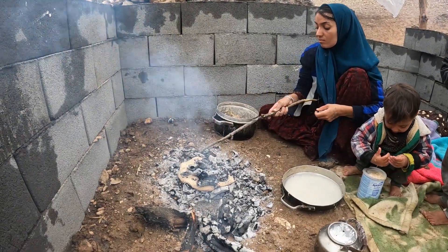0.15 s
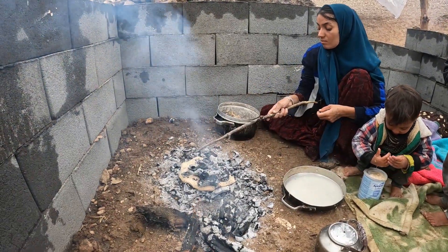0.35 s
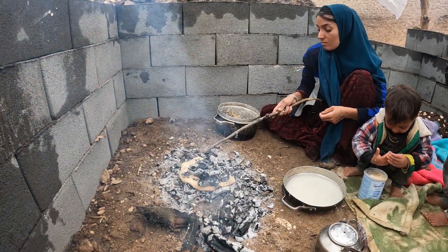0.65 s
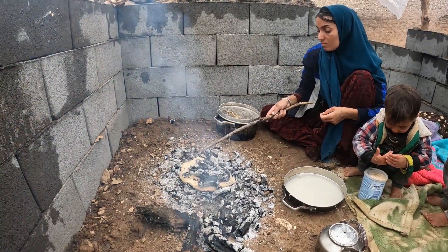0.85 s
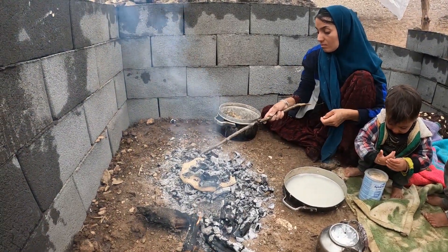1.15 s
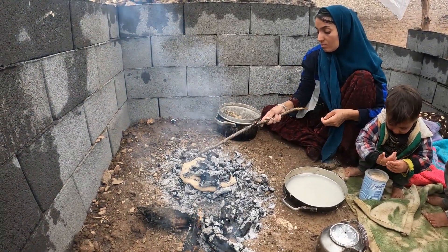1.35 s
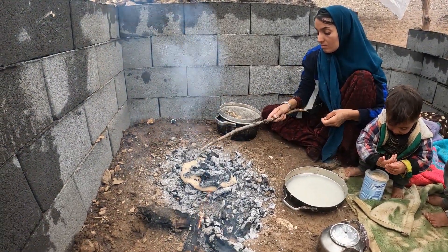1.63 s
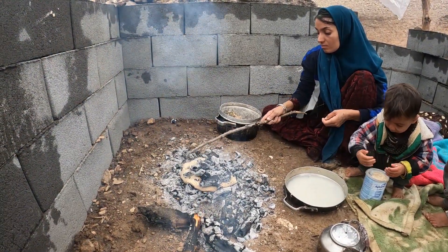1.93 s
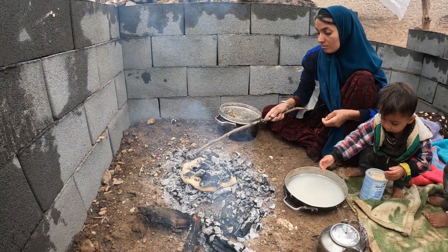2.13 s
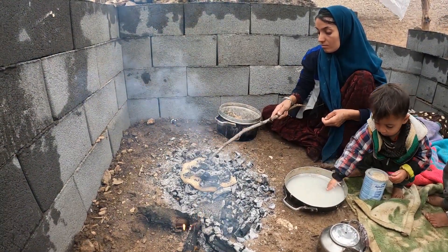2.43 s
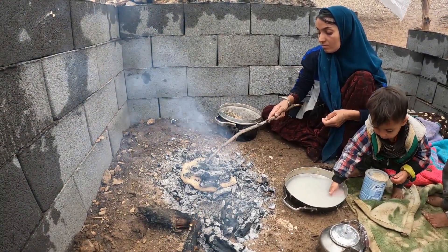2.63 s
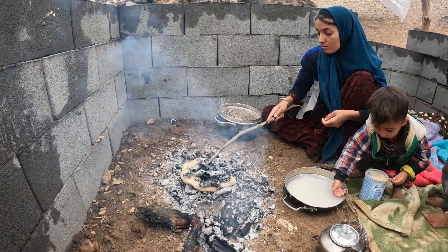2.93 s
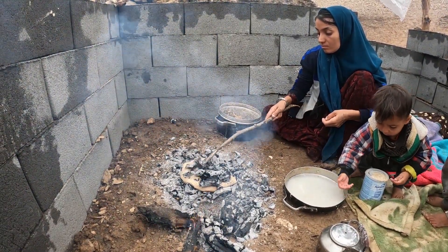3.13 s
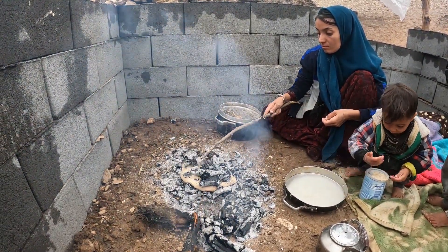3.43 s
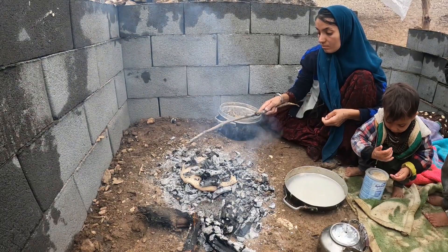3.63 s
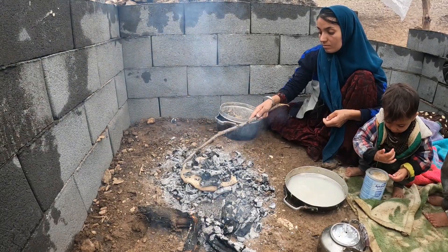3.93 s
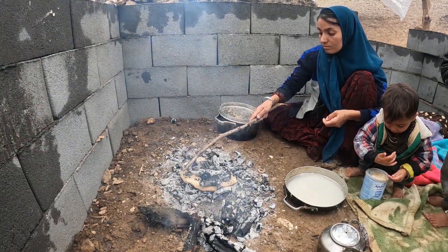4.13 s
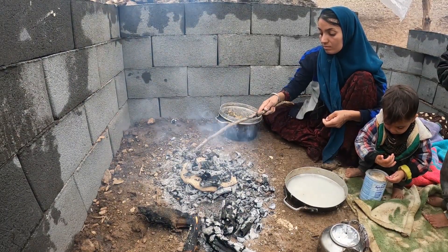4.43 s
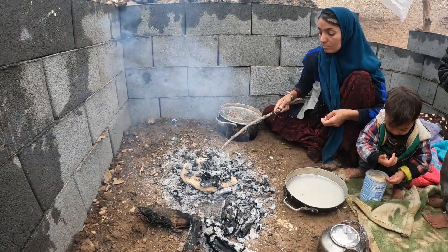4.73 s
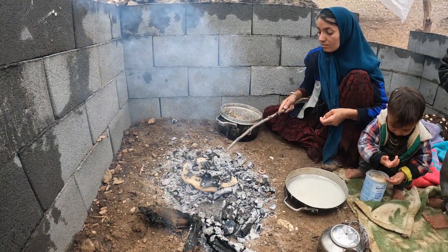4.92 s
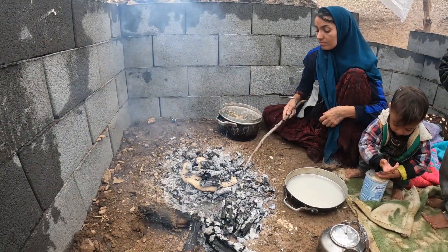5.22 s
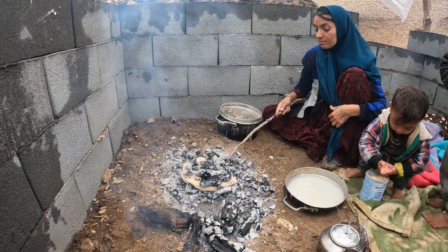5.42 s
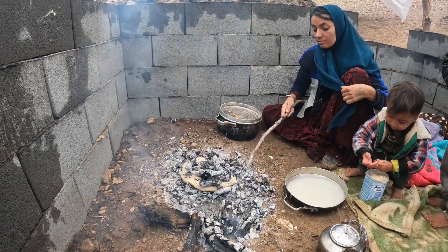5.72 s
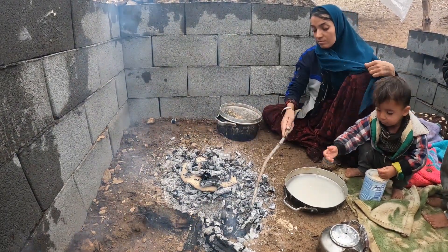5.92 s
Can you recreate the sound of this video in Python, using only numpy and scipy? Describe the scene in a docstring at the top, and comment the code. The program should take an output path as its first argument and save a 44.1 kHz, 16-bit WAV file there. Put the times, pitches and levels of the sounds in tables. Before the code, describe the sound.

Steady rain washes and patters on a plastic sheet while embers snap dryly, heavy drips thump, and low wind bumps the microphone.

```python
"""Throughout: rain around a block-walled shelter, a noise wash with impact patter on a plastic sheet and fine ticks.
A breeze (low noise) settles slowly under it; the rain swells at 0.5 s as modal drips and ember snaps set in.
Gusts of the same low noise push the microphone from 0.75 to about 3.9 s and again at 5.1 s.
The sharpest snap comes at 1.7 s; heavy drips crowd the last two seconds. Each hit gets a short wall tail."""
import sys
import numpy as np
from scipy import signal
from scipy.fft import rfft, irfft, next_fast_len
from scipy.io import wavfile
from scipy.ndimage import map_coordinates

SR = 44100
rng = np.random.default_rng(int(sys.argv[2]) if len(sys.argv) > 2 else 0)


def digitize_waveform(pressure):
    """Quantize a signal to 16-bit integers and store it at the path in sys.argv[1].

    Rows of a 2-D input are taken as channels; values are limited to [-1, 1].
    """
    field = np.atleast_2d(pressure).T
    bounded = np.clip(field, -1, 1)
    quanta = np.round(bounded * 32767).astype(np.int16)
    wavfile.write(sys.argv[1], SR, quanta)


N = 267687

# rain level curves, relative: time_s, patter_db, spray_db
RAIN_LEVELS = [(0.0, -49.5, -48), (0.35, -50, -46.5), (0.52, -45.5, -45), (0.78, -49.5, -51),
               (1.2, -50, -46), (1.95, -50, -48.5), (2.3, -50.3, -46), (2.85, -49.5, -47.5),
               (3.3, -50.5, -47), (3.9, -50.5, -49), (4.55, -51.5, -47), (5.1, -51.5, -49.5),
               (5.6, -48.5, -47.5), (6.07, -50.3, -48.5)]
# spectrum of the rain wash: freq_hz, relative_density_db
WASH_SPECTRUM = [(60, 2), (130, -2), (170, 1), (260, -5), (430, -7.5), (620, -5), (840, -8.5), (930, 1.5),
                 (1550, 1), (3000, -4), (7400, -14.5), (9600, -23), (12400, -28), (15000, -37.5)]
# spectrum of one sheet tap: freq_hz, gain_db
SHEET_COLOUR = [(150, -21.5), (500, -5), (1000, -5.5), (1600, -3), (3000, -7), (7000, -10.5), (10000, -25),
                (15000, -40)]
# spectrum of one tick: freq_hz, gain_db
TICK_COLOUR = [(1000, -24), (3000, -9), (7500, -2), (10000, -15), (12500, -11), (15000, -39)]
# heavy drips on the sheet: start_s, relative_level_db, ring_hz, second_ring_hz, thud_db, splash_db
# (thud and splash relative to the level)
DRIPS_ON_SHEET = [(0.0736, -39, 715, 333, 4, -12), (0.4832, -35.5, 563, 440, 3.5, -22),
                  (0.4888, -38.5, 3220, 7000, 3, -1), (0.532, -45, 1900, 3700, -1, -5),
                  (0.562, -27, 1250, 2350, 1.5, -12), (0.6639, -35, 1510, 3030, -7, -9.5),
                  (0.782, -33.5, 700, 1390, -2.5, -31), (0.8758, -35, 510, 2220, 1, -15),
                  (0.9701, -36, 960, 480, -1, -14), (1.032, -41, 560, 1800, 2, -14),
                  (1.158, -44, 2500, 3380, 3, -1.5), (1.165, -42, 2500, 2900, 5, -0.5),
                  (2.177, -39.5, 1050, 620, -5, -15), (2.5419, -33.5, 970, 1650, 5, -15),
                  (2.6177, -36.5, 1150, 250, -3, -25), (2.722, -40.5, 1500, 2600, -18, -7.5),
                  (3.245, -36.5, 990, 1450, -8, -17), (3.8595, -29, 1460, 4000, -1, -9.5),
                  (3.8715, -37.5, 1450, 3800, -4, -6.5), (4.2575, -35, 1190, 2400, -5, -11),
                  (4.371, -34, 685, 1260, -3.5, -12), (4.8546, -38.5, 1220, 2300, 1, -6.5),
                  (4.8888, -40, 1450, 1000, -6, -14), (5.0593, -26.5, 1500, 2680, -5.5, -12),
                  (5.113, -39, 1400, 2500, -11, -18), (5.1735, -32.5, 1120, 2500, -3.5, -10.5),
                  (5.5229, -29.5, 1400, 800, -4.5, -9), (5.5277, -36, 1530, 5400, -2, -8),
                  (5.7172, -29, 685, 1500, 0.5, -7), (5.7788, -28, 1190, 1650, 1, -13.5),
                  (5.8454, -35.5, 1110, 1690, -4, -10.5), (5.926, -42.5, 1600, 2400, -10, -9)]
# ember snaps: start_s, relative_level_db, pitch_hz, log_knock_db (knock relative to the crack)
EMBER_SNAPS = [(0.4055, -37.5, 7450, -9), (0.5478, -35.5, 4410, -14), (1.07, -35.5, 6330, -23),
               (1.2015, -43, 7000, -16), (1.2732, -41, 3980, -14), (1.531, -41, 8000, -16),
               (1.575, -24, 10000, -19), (1.7103, -12, 3620, -15), (1.8302, -42.5, 9000, -16),
               (1.93, -37.5, 7500, -1), (2.9552, -37.5, 3600, -12), (3.1687, -37, 6640, -18),
               (3.2818, -34.5, 5500, -18), (3.338, -38, 11000, -14), (3.5502, -30, 6450, -18),
               (3.6585, -40.5, 7000, -14), (4.245, -44, 8500, -16), (4.388, -44, 9500, -16),
               (4.422, -27, 1500, -1.5), (4.4233, -20.5, 9200, -9), (4.533, -48, 3200, -17),
               (4.6943, -31.5, 5770, -16), (5.038, -38, 7590, -21), (5.4953, -32, 8470, -12)]
# spectrum of a wood crack: freq_hz, gain_db
CRACK_COLOUR = [(200, -10), (1000, -14), (1700, 1), (2600, 4), (8500, 2), (10000, -3), (12500, -5),
                (15000, -21)]
# gusts on the microphone: start_s, relative_level_db, hold_s
WIND_GUSTS = [(0.752, -44.5, 0.34), (1.197, -43, 0.098), (1.422, -47.5, 0.08), (1.629, -45.5, 0.054),
              (1.84, -42, 0.09), (2.033, -42.5, 0.03), (2.823, -55, 0.18), (2.954, -48.5, 0.17),
              (3.18, -49.5, 0.26), (3.66, -56, 0.12), (5.114, -56.5, 0.07)]
# spectrum of the draught: freq_hz, relative_density_db
RUMBLE_SPECTRUM = [(8.8, -34), (15, 10), (35, 3), (85, -11), (130, -21.5), (220, -35), (290, -56),
                   (480, -120)]
# left-right correlation of rain wash and draught: freq_hz, correlation (no unit)
STEREO_LIKENESS = [(100, 0.93), (500, 0.68), (1200, 0.79), (2400, 0.4), (5000, 0.75), (9000, 0.62),
                   (13000, 0.067)]
# decay of the wall answer: freq_hz, t60_s
WALL_DECAY = [(200, 0.2), (1500, 0.07), (5000, 0.12), (12000, 0.083)]

TOP_HZ = 15850
HIT_SIZE = 8192  # samples
HIT_S = np.arange(HIT_SIZE) / SR
HIT_HZ = np.fft.rfftfreq(HIT_SIZE, 1 / SR)

SLAP_DB, SLAP_DB_PER_SPLASH_DB = 3, 0.57  # slap at 2.8 kHz grows with the splash
DRIP_ECHO_S, DRIP_ECHO_DB = 0.0036, -1.5  # mean delay and strength of the nearest wall's return
DRIP_T60_S = 0.02  # shortest tap
SHEET_LAG_S = 0.001214  # travel time of a 1 kHz ripple across the sheet
FIRE_PAN_DB = 3  # left minus right
LOG_HZ, LOG_Q = 1030, 1.5  # knock of a splitting log
BOOM_HZ, BOOM_DB = 170, -22.5  # hollow note of the shelter, relative to the crack
GUST_ATTACK_S, GUST_RELEASE_S = 0.03, 0.04
BREEZE_DB, BREEZE_FALL_DB_PER_S = -58.5, 0.77  # relative level at the start; settling rate


def amp(db):
    """Decibels to gain."""
    return 10 ** (np.asarray(db) / 20)


def unit(x):
    """Scale to rms 1."""
    return x / np.sqrt(np.mean(x ** 2) + 1e-20)


def blow(x):
    """Scale to the energy of one millisecond at rms 1."""
    return x * np.sqrt(SR / 1000 / np.sum(x ** 2))


def along(points, hz):
    """Interpolate (Hz, value) points on a log-frequency axis."""
    point_hz, value = np.transpose(points)
    return np.interp(np.log(hz + 1), np.log(point_hz + 1), value)


def curves(rows):
    """One value per sample for each column after the time."""
    time_s, *columns = np.transpose(rows)
    return [np.interp(np.arange(N) / SR, time_s, column) for column in columns]


def wobble(knots_per_s):
    """Smooth random curve through normal knots."""
    knots = rng.standard_normal(int(N * knots_per_s / SR) + 4)
    return map_coordinates(knots, [np.arange(N) * knots_per_s / SR])


def filtered(x, response):
    """Multiply the spectrum of x by a function of frequency."""
    size = next_fast_len(N + SR // 2)
    spectrum = rfft(x, size) * response(np.fft.rfftfreq(size, 1 / SR))
    return irfft(spectrum, size)[..., :N]


def resonance(hz, q):
    """Causal response of one damped mode."""
    damping = 1j * HIT_HZ * hz / q
    return damping / (hz ** 2 - HIT_HZ ** 2 + damping)


def delay(seconds):
    """Response of a longer path: linear phase."""
    return np.exp(-2j * np.pi * HIT_HZ * seconds)


def causal(points):
    """Minimum-phase response through (Hz, dB) points, by folding the cepstrum."""
    cepstrum = irfft(np.log(amp(along(points, HIT_HZ))))
    cepstrum[1:HIT_SIZE // 2] *= 2
    cepstrum[HIT_SIZE // 2 + 1:] = 0
    return np.exp(rfft(cepstrum))


def burst(t60_s, rough):
    """Spectrum of a sharp push with a quickly dying rattle."""
    rattle = unit(rng.standard_normal(HIT_SIZE) * amp(-60 * HIT_S / t60_s))
    push = rough * rattle / np.sqrt(HIT_SIZE)
    push[0] += 1
    return rfft(push)


def spread(pair, spectrum):
    """Two unrelated signals to coloured stereo of rms 1, correlated by STEREO_LIKENESS."""
    def mid_side(hz):
        angle = np.arccos(np.clip(along(STEREO_LIKENESS, hz), -1, 1)) / 2
        return amp(along(spectrum, hz)) * [np.cos(angle), np.sin(angle)]

    mid, side = filtered(pair, mid_side)
    return unit(np.array([mid + side, mid - side]))


def in_shelter(hit, pan_db, wet_db, width):
    """Pan a hit by level and add a wall answer: noise decaying at its own rate in each band."""
    hz, time_s, noise = signal.stft(rng.standard_normal((2, HIT_SIZE)), SR, nperseg=256)
    decay = amp(-60 * time_s / along(WALL_DECAY, hz)[:, None])
    mid, side = signal.istft(noise * decay, SR, nperseg=256)[1]
    onset = 1 - np.exp(-HIT_S / 0.002)
    tail = np.array([mid + width * side, mid - width * side]) * onset
    tail = tail / np.linalg.norm(tail[0])
    answer = signal.fftconvolve(hit[None], tail, axes=1)[:, :HIT_SIZE]
    return (hit + amp(wet_db) * answer) * amp([[pan_db / 2], [-pan_db / 2]])


def add(out, start_s, sound):
    """Mix a stereo hit in at its start time."""
    start = int(np.clip(round(start_s * SR), 0, N - 1))
    out[:, start:start + HIT_SIZE] += sound[:, :N - start]


def drops(per_second, scatter_db):
    """Impacts at random moments, most weak and a few strong: capped exponential in dB."""
    count = int(per_second * N / SR)
    when, strength = rng.random((count, 2)).T
    size = amp(scatter_db * np.minimum(-np.log(1 - strength), 3))
    return np.bincount((when * N).astype(int), size, N)[:N]


def rain():
    """Far drops merge into a wash; nearer ones patter on the sheet and tick on the wet ground."""
    patter_db, spray_db = curves(RAIN_LEVELS)
    wash = spread(rng.standard_normal((2, N)), WASH_SPECTRUM)
    spray = filtered(wash, lambda hz: hz ** 2 / (hz ** 2 + 3500 ** 2))
    body = (wash - spray) * amp(patter_db + 1 + 2.05 * wobble(45))
    spray = spray * amp(spray_db - 1.54 + 1.87 * wobble(60))
    return body + spray + amp(patter_db - 3.0) * patter() + amp(spray_db - 13.0) * ticks()


def patter(spots=12):
    """Small drops hit many spots of the sheet, each with its own mode pitch and path to the ear."""
    out = np.zeros((2, N))
    for pitch, side in rng.standard_normal((spots, 2)):
        tone = causal(SHEET_COLOUR) * (0.11 + resonance(1500 * 2 ** (.55 * pitch), q=1.45))
        tap = blow(irfft(burst(t60_s=0.031, rough=3.0) * tone))
        path = in_shelter(tap, 1 + 1.7 * side, wet_db=-4.5, width=0.33)
        impacts = drops(per_second=8, scatter_db=3.0)
        out += signal.fftconvolve(impacts[None], path, axes=1)[:, :N]
    return unit(out)


def ticks(spots=10):
    """Fine bright impacts, one broad mode per spot, widely panned."""
    out = np.zeros((2, N))
    for pitch, side in rng.standard_normal((spots, 2)):
        tone = causal(TICK_COLOUR) * resonance(4600 * 2 ** (.5 * pitch), q=1.15)
        tick = blow(irfft(burst(t60_s=0.0055, rough=2.7) * tone))
        path = in_shelter(tick, 1 + 8.1 * side, wet_db=0.5, width=0.83)
        impacts = drops(per_second=10, scatter_db=8.5)
        out += signal.fftconvolve(impacts[None], path, axes=1)[:, :N]
    return unit(out)


def drips():
    """A heavy drip thumps the sheet, rings two modes and splashes; the wall repeats it in milliseconds."""
    out = np.zeros((2, N))
    # dispersive sheet: low ripples arrive later
    ripple = np.exp(-4j * np.pi * SHEET_LAG_S * np.sqrt(1000 * HIT_HZ))
    for start_s, level_db, ring_hz, second_hz, thud_db, splash_db in DRIPS_ON_SHEET:
        slap_db = SLAP_DB + SLAP_DB_PER_SPLASH_DB * splash_db
        colour = [(120, thud_db - 9.5), (300, thud_db), (600, thud_db - 1), (1000, 1.5), (1700, -2.5),
                  (2800, slap_db), (5500, splash_db), (7600, splash_db - 4.0),
                  (9500, splash_db - 16.5), (15000, splash_db - 31)]
        ring = (.7 + resonance(ring_hz, q=3.5)) * (1 + .9 * resonance(second_hz, q=4.5))
        echo_s = DRIP_ECHO_S * (1 + .06 * rng.uniform(-1, 1))
        # a drip that is mostly slap breaks up, and its droplets scatter for longer
        breakup_db = max(slap_db + 3, 0)
        t60_s = DRIP_T60_S + .007 * breakup_db
        rough = .8 + .3 * breakup_db
        direct = burst(t60_s, rough)
        echo = amp(DRIP_ECHO_DB) * burst(t60_s, rough) * delay(echo_s)
        strike = rfft(blow(irfft(direct + echo)))
        tap = irfft(strike * ripple * causal(colour) * ring)
        placed = in_shelter(tap, pan_db=1.8, wet_db=-8, width=.5)
        add(out, start_s, amp(level_db + 13.0) * placed)
    return out


def embers():
    """Charred wood splits with a dry crack, returned by the ground; the log knocks, the shelter booms."""
    out = np.zeros((2, N))
    knock = blow(irfft(resonance(LOG_HZ, LOG_Q) * resonance(LOG_HZ, q=.6) * delay(.0004)))
    boom = amp(BOOM_DB) * blow(irfft(resonance(BOOM_HZ, q=4) ** 2))
    for start_s, level_db, pitch_hz, knock_db in EMBER_SNAPS:
        split = burst(t60_s=.005, rough=1.3)
        ground = .22 * burst(t60_s=.007, rough=1.2) * delay(.0012)
        # a small piece radiates little well below its own pitch
        splinter = 1j * HIT_HZ / (1j * HIT_HZ + .5 * pitch_hz)
        wood = (0.75 + resonance(pitch_hz, q=3.1)) * splinter * causal(CRACK_COLOUR)
        crack = blow(irfft((split + ground) * wood))
        snap = crack + amp(knock_db) * knock + boom
        placed = in_shelter(snap, FIRE_PAN_DB, wet_db=-8, width=1.1)
        add(out, start_s, amp(level_db - 4.5) * placed)
    return out


def draught():
    """Slow eddies push on the microphone: low noise as a faint breeze, and gusts that rise, hold and die."""
    time_s = np.arange(N) / SR
    power = amp(BREEZE_DB - BREEZE_FALL_DB_PER_S * time_s) ** 2
    for start_s, level_db, hold_s in WIND_GUSTS:
        rise = np.clip((time_s - start_s) / GUST_ATTACK_S, 0, 1)
        fall = np.exp(-np.maximum(time_s - start_s - GUST_ATTACK_S - hold_s, 0) / GUST_RELEASE_S)
        power = power + (amp(level_db) * rise * fall) ** 2
    flutter = amp(2.0 + 2.9 * wobble(16))
    return np.sqrt(power) * flutter * spread(rng.standard_normal((2, N)), RUMBLE_SPECTRUM)


def scene():
    """Sum of the sources: rain a little to the left, draught to the right."""
    return rain() * amp([[.4], [-.4]]) + drips() + embers() + draught() * amp([[-1], [1]])


def record(dry):
    """Band limit: nothing passes at or above TOP_HZ."""
    return filtered(dry, lambda hz: hz < TOP_HZ)


dry = scene()
out = record(dry)
digitize_waveform(out)
```